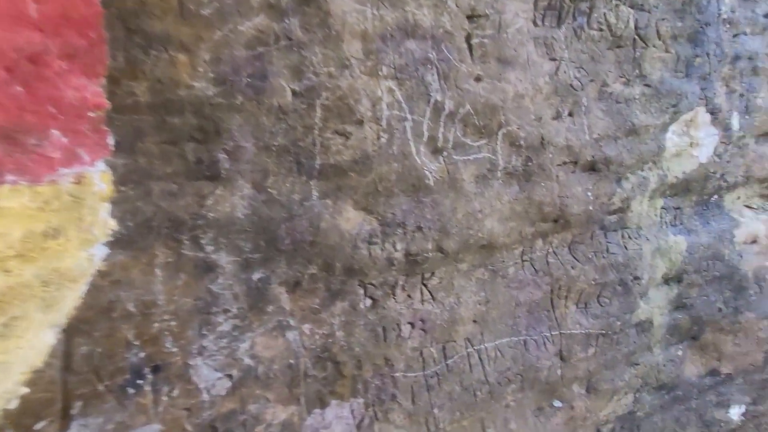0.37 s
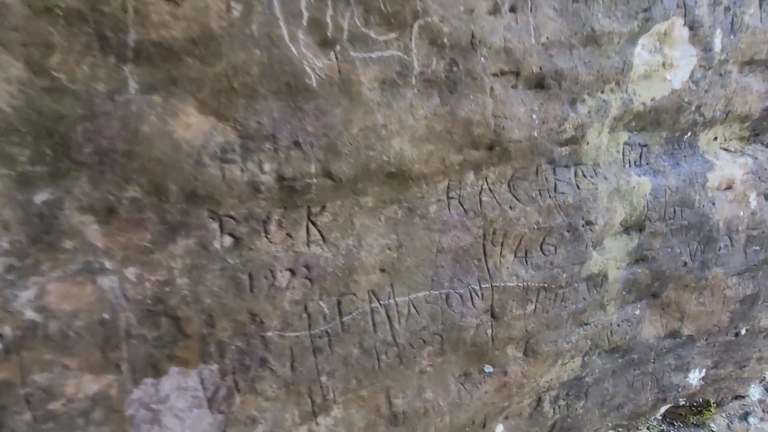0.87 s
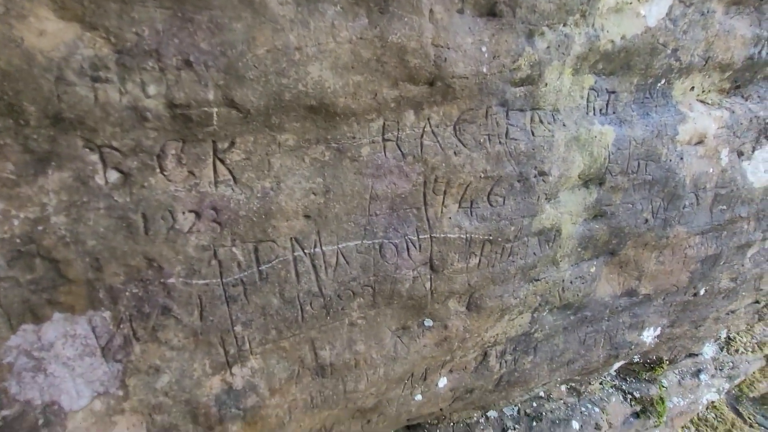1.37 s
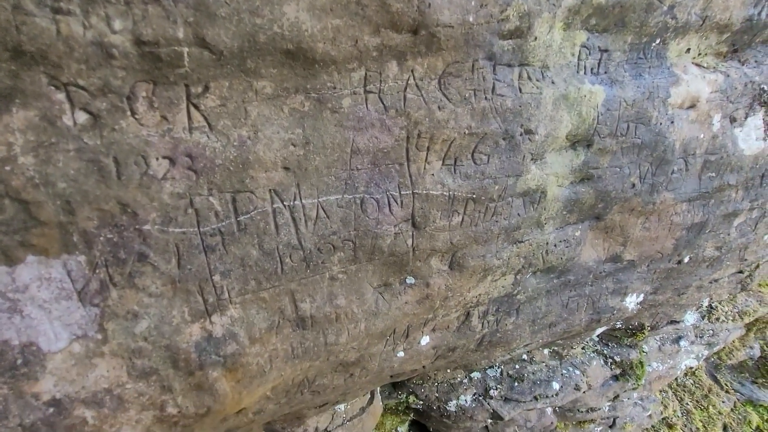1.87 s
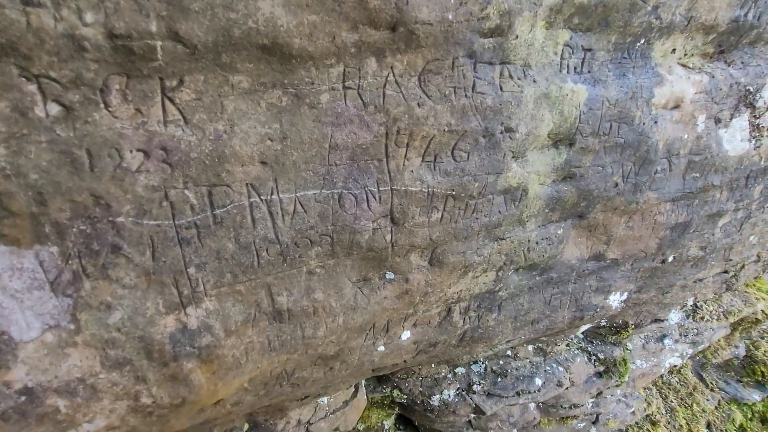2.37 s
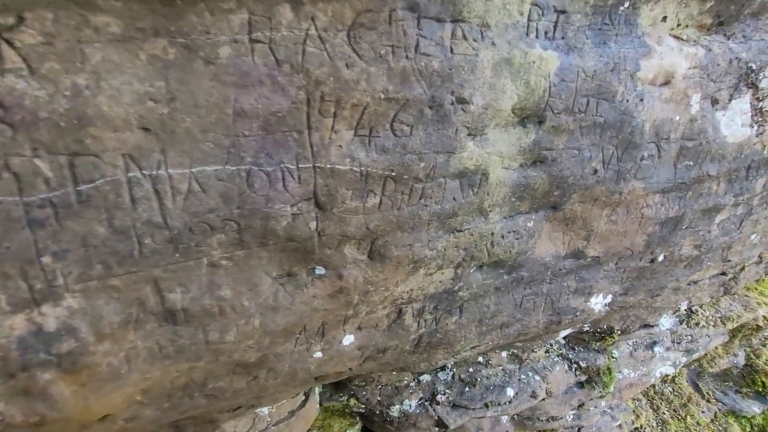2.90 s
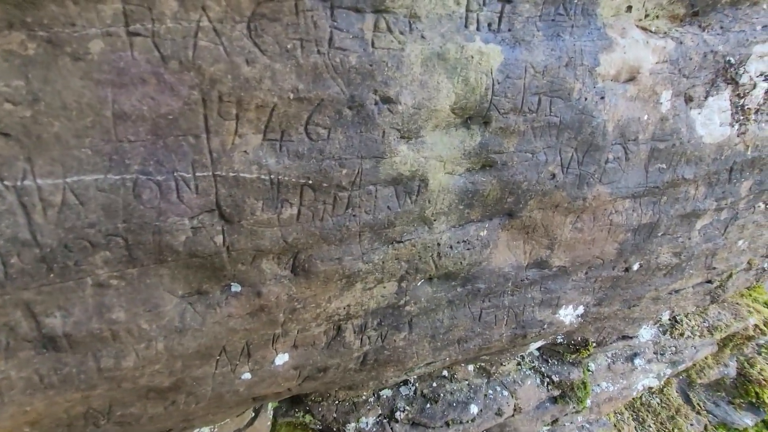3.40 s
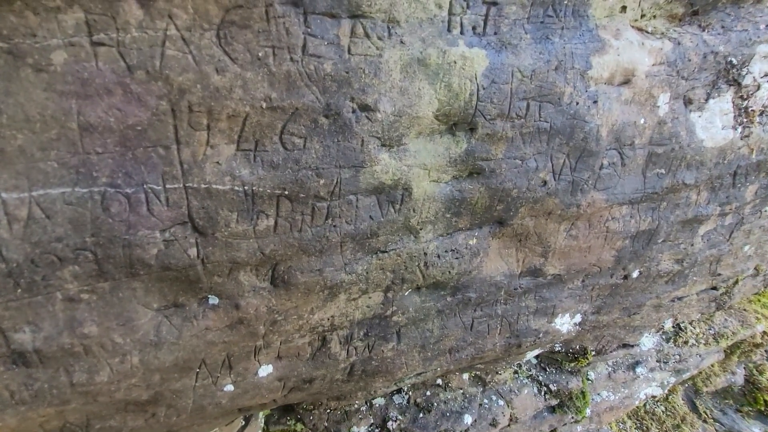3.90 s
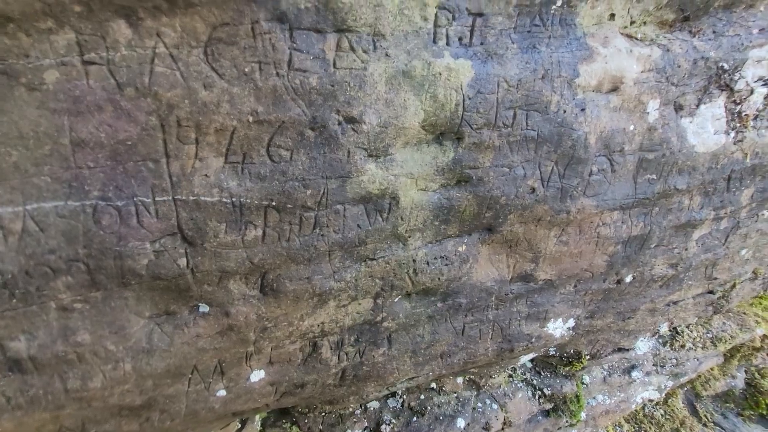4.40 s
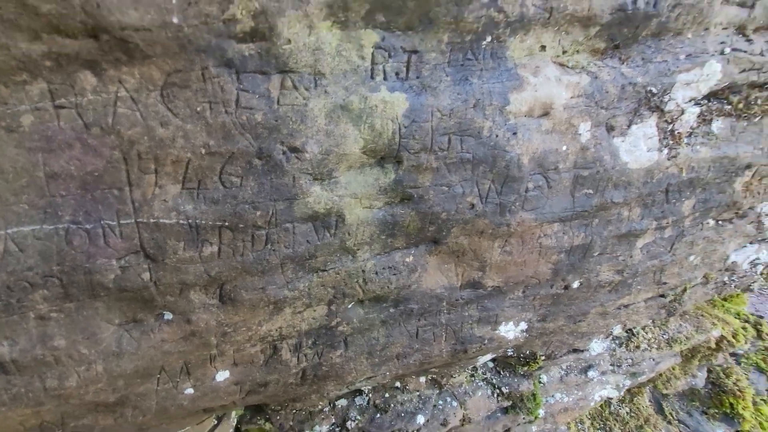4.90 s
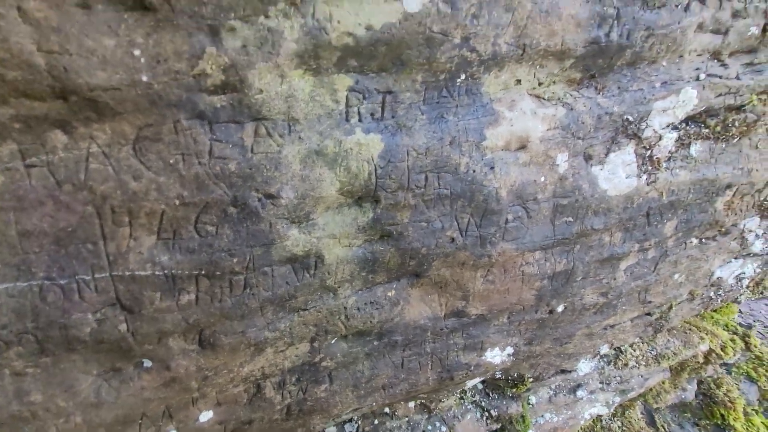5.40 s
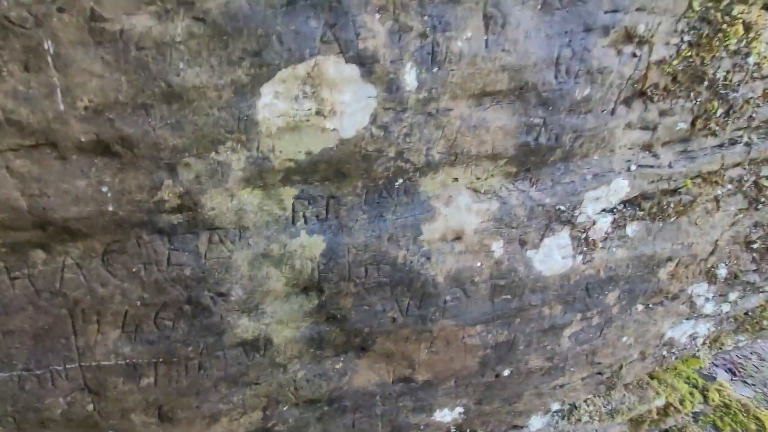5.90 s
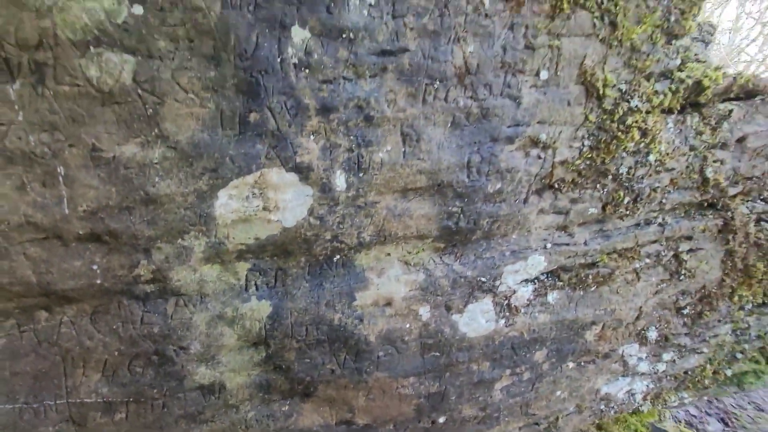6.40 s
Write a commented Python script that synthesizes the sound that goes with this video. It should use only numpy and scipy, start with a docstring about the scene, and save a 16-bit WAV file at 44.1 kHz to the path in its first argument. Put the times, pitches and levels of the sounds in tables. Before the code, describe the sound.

Outdoors in woodland beside rock, a handheld camera picks up rustle, hiss and finger ticks. A soft low thump comes as a small bird begins thin chips, then quickens into a bright trill, falling notes and a firm final flourish. Fainter birds whistle behind. After the song it is quieter, with a faint insect drone, then sharper ticks and scuffs, mostly on the left, and a bright rub at the end.

```python
"""Woodland: a small songbird trills, its gliding tones blurred by echoes from trunks and rock; other birds whistle.
A handheld camera's motion makes rustle in a lower and a middle band, cloth noise and hiss, all filtered random
noise, swell and fade, over wind rumble and buffeting with a strength curve of their own.
Fingers tick and scuff its body and soft bumps thump it: damped modes and noise bursts.
A faint insect drones past on a harmonic series."""
import sys
import numpy as np
from scipy import signal
from scipy.fft import rfft, irfft, next_fast_len
from scipy.io import wavfile
from scipy.ndimage import uniform_filter1d, map_coordinates

SR = 44100
rng = np.random.default_rng(int(sys.argv[2]) if len(sys.argv) > 2 else 0)


def convert_level_to_amplitude(level_db):
    """Map a level in decibels to its linear amplitude factor."""
    exponent = np.asarray(level_db, float) / 20
    return 10 ** exponent


def generate_wav(signal):
    """Clip the signal to [-1, 1] and save it as 16-bit WAV at the path in sys.argv[1]."""
    frames = np.transpose(np.atleast_2d(signal))
    scaled = np.clip(frames, -1, 1) * 32767
    pcm = np.round(scaled).astype(np.int16)
    wavfile.write(sys.argv[1], SR, pcm)


N = 287532

# resonant modes of camera and hand: frequency_hz, t60_s
BODY_MODES = [(70, 0.31), (129, 0.2), (240, 0.046), (380, 0.023), (850, 0.0077), (1300, 0.0035)]
# soft bumps of the hand, relative levels: time_s, boom_db, shudder_db
HAND_BUMPS = [(0.05, -59, -60), (0.541, -61, -52), (.832, -56, -40.5), (.935, -72, -47), (1.0, -72, -46.5),
              (1.121, -56, -53), (1.4294, -36.5, -68), (1.4527, -30, -49), (1.4789, -30.5, -56),
              (1.601, -52.5, -60), (1.761, -56.5, -53.5), (1.894, -54.5, -59), (2.446, -62, -53),
              (2.6, -51.5, -57), (3.25, -61, -55), (3.36, -64, -52), (3.52, -70, -58), (4.429, -75, -65),
              (4.54, -77, -66), (4.9672, -45, -54.5), (5.08, -51, -64), (5.151, -51, -50), (5.45, -65, -61),
              (5.65, -50, -62), (5.702, -70, -51.5), (5.8, -51.5, -54), (5.895, -51, -55.5),
              (5.972, -48.5, -50), (6.225, -53, -73), (6.281, -52, -53.5), (6.371, -62, -59)]


def unit(x):
    """Normalisation: divides by the root mean square, giving rms 1."""
    return x / np.sqrt(np.mean(x ** 2) + 1e-20)


def along(points, hz):
    """Spectral interpolation: joins (Hz, value) points by straight lines on a log-frequency axis."""
    point_hz, values = np.transpose(points)
    return np.interp(np.log(hz + 1), np.log(point_hz + 1), values)


def curves(rows):
    """Slow control: joins each column after the time by straight lines, one value per sample."""
    times, *columns = np.transpose(rows)
    return [np.interp(np.arange(N) / SR, times, column) for column in columns]


def wobble(rate):
    """Random modulation: a smooth curve through random knots, rate of them per second."""
    knots = rng.standard_normal(int(N * rate / SR) + 4)
    return map_coordinates(knots, [np.arange(N) * rate / SR])


def sides(pan_db):
    """Level panning: left and right gains pan_db apart, with constant total power."""
    left = convert_level_to_amplitude(pan_db)
    return np.array([left, left ** 0]) * np.sqrt(2 / (1 + left ** 2)) * np.sqrt(2)


def airborne(x):
    """Propagation delay: sound through the air reaches the right port after the left."""
    delay_s = 0.00038
    return np.array([x[0], np.roll(x[1], round(delay_s * SR))])


def swell(s, db, rise, fall):
    """Exponential growth and decay: a gain that peaks at db at time s, with slopes in dB per second."""
    late = np.arange(N) / SR - s
    return convert_level_to_amplitude(db - np.where(late < 0, -rise * late, fall * late))


def rush(tone, alike, patchy_db):
    """Filtered noise: coloured stereo noise of rms 1, patchy in time and frequency, correlated by alike."""
    hz, _, spectrum = signal.stft(rng.standard_normal((2, N)), SR, nperseg=2048)
    field = rng.standard_normal(spectrum.shape[1:])
    field = uniform_filter1d(field, 20, axis=0)  # across frequency
    field = uniform_filter1d(field, 3, axis=1)  # across time
    gain = convert_level_to_amplitude(along(tone, hz)[:, None] + patchy_db * unit(field))
    a, b = signal.istft(spectrum * gain, nperseg=2048)[1][:, :N]
    turn = np.arccos(np.clip(alike, 0, 1)) / 2
    common, opposed = np.cos(turn) * a, np.sin(turn) * b
    return unit(np.array([common + opposed, common - opposed]))


def rings(db, modes, t):
    """Modal resonance: one blow starts damped sines, each at a slightly random level with a soft onset."""
    total = 0
    for hz, t60 in modes:
        decay = convert_level_to_amplitude(db + rng.normal(0, 1) - 60 * t / t60)
        onset = 1 - np.exp(-3 * hz * t)
        total = total + decay * np.sin(2 * np.pi * hz * t) * onset
    return total


def echoes(stretch):
    """Diffuse reverberation: a dense crowd of near echoes, then a fainter decay whose rate varies with pitch."""
    # woodland decay: frequency_hz, t60_s before the stretch
    wood_decay = [(2000, 0.97), (4500, 0.43), (8000, 0.56)]
    hz, t, spectrum = signal.stft(rng.standard_normal((2, SR // 3)), SR, nperseg=128)
    build_up = 1 - 0.51 * np.exp(-t / 0.0077)
    near = (1 + 1.22 / (1 + (t / 0.045) ** 6)) * build_up
    decay = convert_level_to_amplitude(-60 * t / (stretch * along(wood_decay, hz)[:, None]))
    tail = signal.istft(spectrum * near * decay, SR, nperseg=128)[1]
    return tail / np.linalg.norm(tail[0]) * np.sqrt(2)


def bird(notes, buzz, direct_db, stretch, pan_db):
    """Frequency modulation: gliding sines buzz, deeper the wider they glide, each note with fresh echoes."""
    buzz_floor_hz = 249  # added to the glide's width, so that even a level note buzzes
    out = np.zeros((2, N + 2 * SR))
    buzz_hz = 230 * convert_level_to_amplitude(3 * wobble(90))
    quaver = buzz * np.sin(np.cumsum(2 * np.pi * buzz_hz / SR))
    for s, length, *glide, db in notes:
        start = round(s * SR)
        u = np.linspace(0, 1, round(length * SR))
        pitch = np.polyval(np.polyfit([0, 0.5, 1], glide, 2), u)
        pitch = pitch + (np.ptp(glide) + buzz_floor_hz) * quaver[start:][:len(u)]
        envelope = convert_level_to_amplitude(db) * np.sqrt(2) * np.sin(np.pi * u) ** 0.2
        note = envelope * np.sin(2 * np.pi * np.cumsum(pitch) / SR)
        path = echoes(stretch)
        path[:, 0] += convert_level_to_amplitude(direct_db)
        heard = signal.fftconvolve(note[None], path, axes=1)
        out[:, start:start + heard.shape[1]] += heard
    return out[:, :N] * sides(pan_db)[:, None]


def insect():
    """Harmonic series: a wavering wing-beat drone, its third and fourth partials set strongest."""
    # wing beat before random wavering: time_s, pitch_hz, level_db
    wing_beats = [(2.5, 210, -91), (2.7, 212, -98), (3.4, 241.8, -90), (3.8, 231, -95), (4.04, 219, -70),
                  (4.15, 212.7, -82), (4.55, 196, -84.5), (4.75, 195, -99)]
    hz, db = curves(wing_beats)
    phase = 2 * np.pi * np.cumsum(hz * (1 + 0.01123 * wobble(25))) / SR
    partials = [(1, -4), (2, -4), (3, -1), (4, -2)]  # multiple, level_db
    return sum(convert_level_to_amplitude(db + level + 5.4 * wobble(7)) * np.sin(k * phase) for k, level in partials)


def wind():
    """Low-frequency turbulence: lumpy rumble and shell buffeting, alike in both ports; bumps add shudder."""
    # wind on the ports, relative level: time_s, level_db
    wind_levels = [(0, -60), (.16, -64), (.56, -63.5), (1.16, -65), (1.43, -67.5), (1.75, -69), (2.01, -65),
                   (2.2, -68), (2.61, -65.5), (3.27, -65), (3.83, -70), (4.05, -72), (4.54, -74),
                   (5.04, -62), (5.43, -70), (5.9, -76), (6.26, -64), (6.41, -57.5), (6.52, -58.5)]
    # noise colours: frequency_hz, relative_level_db
    rumble_tone = [(21, -61), (36, -28), (48, 11), (65, -3.5), (110, -8), (140, -50), (240, -120)]
    buffet_tone = [(59, -43), (100, -12), (151, 7), (188, -6), (247, -1), (291, -5), (400, -18.5),
                   (520, -64), (880, -120)]
    shake_db = 0.5  # the shell's steady shaking over the wind
    rise_db_per_s, fall_db_per_s = 505, 170  # shudder slopes
    wind_db, = curves(wind_levels)
    shudder_power = sum(swell(s, db, rise_db_per_s, fall_db_per_s) ** 2 for s, _, db in HAND_BUMPS)
    rumble_noise = convert_level_to_amplitude(1.1 * wobble(14)) * rush(rumble_tone, alike=1.0, patchy_db=-3.0)
    rumble = convert_level_to_amplitude(wind_db + 5.5) * unit(rumble_noise)
    buffet_noise = convert_level_to_amplitude(1.93 * wobble(18)) * rush(buffet_tone, alike=0.92, patchy_db=-0.56)
    buffet = np.sqrt(convert_level_to_amplitude(wind_db + shake_db) ** 2 + shudder_power) * unit(buffet_noise)
    return (rumble + buffet) * convert_level_to_amplitude([[-0.7], [0.7]])  # right slightly louder


def motion():
    """Amplitude-modulated noise: rustle, cloth and hiss follow the camera's motion, with bright rubs."""
    # the camera's motion: time_s, strength_db, heaviness_db, left_minus_right_db (last two scaled per layer)
    camera_motion = [(0, -56, 8, -3), (.13, -57.5, 4.5, 1), (.25, -54, 4, 1), (.56, -51.5, 1, 1.5),
                     (.83, -53, 0, 0.5), (.94, -53.5, 4.5, 1), (1.23, -59, 0, -1), (1.72, -60.5, -5, -1),
                     (1.84, -62.5, 14, 2), (1.98, -61.5, -5, -3), (2.27, -65, -1, -2),
                     (2.42, -62, -2.5, -3), (2.46, -57, 1.5, -4), (2.6, -54, 2, -0.5), (2.89, -61, -1, 3),
                     (3.05, -63.5, -1, 0), (3.11, -57.5, -7, 3), (3.27, -57.5, -6.5, 2),
                     (3.38, -60, 2.5, 1), (3.6, -54, -3, 4.5), (3.85, -60.5, -3.5, 3), (4.01, -60, -3, 3),
                     (4.21, -69.5, 0.5, 1.5), (4.38, -80, 10, -6), (4.52, -70.5, 1, 2),
                     (4.7, -60.5, -3.5, -3), (4.85, -58, -2.5, 3), (5.0, -58.5, 4.5, -2),
                     (5.1, -62.5, 6, 0), (5.45, -61.5, -1, 3), (5.75, -63, 8.5, 0), (5.765, -51.5, 0.5, -7),
                     (5.81, -58, 1.5, -5), (5.87, -66, 6.5, -4), (5.95, -62, 4.5, -4), (6.15, -55, -5.5, 5),
                     (6.3, -54.5, 5, -9), (6.42, -53, 2, -2), (6.52, -47, 0, -8)]
    # brighter rubs by the right port: peak_s, level_db, left_minus_right_db
    rubs = [(6.36, -50.5, -16), (6.52, -33.5, -23)]
    # noise colours: frequency_hz, relative_level_db
    rustle_tone = [(190, -15), (330, 2), (488, 0), (696, -2.5), (1000, 0.5), (1310, -3.5), (2000, -6),
                   (2600, -21), (4400, -120)]
    # the middle band of the handling rustle: frequency_hz, relative_level_db
    middle_rustle_tone = [(1060, -12), (1800, -6.5), (2370, -1.5), (3300, -1), (3700, -0.5), (4810, -2),
                          (8140, -120)]
    # noise colours: frequency_hz, relative_level_db
    cloth_tone = [(2060, -46), (3500, -9), (4440, -1), (5630, -1), (6550, -2.5), (7180, -1), (7610, -4.5),
                  (8400, -18), (10900, -12.5), (18500, -120)]
    hiss_tone = [(4700, -43), (8000, -3.5), (8500, -5.5), (9000, -5.5), (12000, 5.5), (15000, 11),
                 (15750, 14), (15950, -37)]
    swipe_tone = [(1470, -34), (2500, -20), (2940, -17), (3230, -17), (5340, -16), (7190, -1.5),
                  (9500, -21), (12400, -48), (20900, -120)]
    still_strength_db = -60  # strength of a quiet hold
    rise_db_per_s, fall_db_per_s, swipe_hiss_db = 235, 600, -4
    flicker_db = 0.9 * wobble(25)  # shared by all layers
    strength_db, heavy_db, turn_db = curves(camera_motion)
    swipe = sum(swell(s, db, rise_db_per_s, fall_db_per_s) * sides(pan_db)[:, None]
                for s, db, pan_db in rubs)
    # colour, still_db, growth with strength, share of heaviness, pan_db, share of turning, correlation,
    # share of the swipes
    layers = [(rustle_tone, -68.5, 1.01, 1.01, -1.5, 0.3, 0.6, 0.03),
              (middle_rustle_tone, -71, 1.4, 0.6, -1.5, 0.4, 0.4, 0.06),
              (cloth_tone, -61, 1.05, 0.1, -6, 0.6, 0.2, 0),
              (hiss_tone, -59.7, 1.01, -0.05, 6.5, 1.01, 0, convert_level_to_amplitude(swipe_hiss_db))]
    out = np.zeros((2, N))
    for tone, still_db, grows, heavy, pan_db, turns, alike, swiped in layers:
        level_db = still_db + grows * (strength_db - still_strength_db) + heavy * heavy_db
        gain = np.hypot(convert_level_to_amplitude(level_db), swiped * swipe.mean(axis=0))
        noise = airborne(rush(tone, alike, patchy_db=2.18))
        out += convert_level_to_amplitude(flicker_db) * gain * sides(pan_db + turns * turn_db) * noise
    return out + swipe * rush(swipe_tone, alike=0, patchy_db=1.3)


def scuffs():
    """Stick-slip friction: skin slides over the shell, lumpy broad noise under each stroke."""
    # fingers sliding, relative level: start_s, length_s, level_db, left_minus_right_db
    strokes = [(0.93, 0.031, -52.5, -20), (1.803, 0.126, -59, 1.5), (4.969, 0.061, -48, -0.5),
               (5.164, 0.06, -55, -3.5), (5.664, 0.051, -38.5, -4), (5.759, 0.021, -58, 0)]
    # noise colour: frequency_hz, relative_level_db
    scuff_tone = [(120, -49), (200, -1), (423, 5), (598, -8), (1200, -2), (2310, -18.5), (5060, -7),
                  (9080, -15), (15700, -12.5)]
    gain = np.zeros((2, N))
    for s, length, db, pan_db in strokes:
        u = np.linspace(0, 1, round(length * SR))
        arc = np.sin(np.pi * u ** 0.97) ** 0.4
        gain[:, round(s * SR):][:, :len(u)] += convert_level_to_amplitude(db) * arc * sides(pan_db)[:, None]
    return gain * unit(convert_level_to_amplitude(2.3 * wobble(250)) * rush(scuff_tone, alike=0.54, patchy_db=2.0))


def bumps():
    """Modal resonance: soft bumps of the hand boom in the two lowest modes, alike in both ports."""
    out, t = np.zeros((2, N + SR)), np.arange(SR // 3) / SR
    for s, boom_db, _ in HAND_BUMPS:
        out[:, round(s * SR):][:, :len(t)] += rings(boom_db + 3.5, BODY_MODES[:2], t)
    return out[:, :N]


def taps():
    """Impact excitation: finger taps give a noise tick and ring the upper modes, panned to either port."""
    # finger taps on the camera, relative levels: time_s, tick_db, knock_db, clack_db, left_minus_right_db
    finger_taps = [(0.0489, -27, -48, -46, 3), (0.2505, -43.5, -50, -46, 6), (0.7876, -42, -49, -67, -5),
                   (0.8317, -51, -34, -51, 3.0), (0.9297, -30, -39.5, -57, 0), (0.95, -22.5, -41.5, -48, 1),
                   (0.9993, -40, -41, -70, 2.5), (1.1205, -40, -46.5, -68, -5), (1.4793, -35, -50, -69, 2),
                   (1.7564, -45, -43, -51.5, -2), (1.7905, -54, -47, -42, 5), (1.896, -56, -75, -46, 9),
                   (2.4455, -19, -48, -37.5, -26), (2.5376, -38, -55, -31.5, 7),
                   (2.5995, -45, -64, -47.5, 3.0), (3.017, -46.5, -52.5, -70, -6),
                   (4.997, -25, -61, -49, 7), (5.0784, -28.5, -54, -54, -19), (5.151, -16, -41.5, -44, -24),
                   (5.5583, -52, -62, -49, -3), (5.6505, -28, -67, -66, -16),
                   (5.801, -14.5, -42.5, -63, -26), (5.8545, -44, -58, -42.5, -1),
                   (5.8933, -18, -40.5, -49, -22), (5.974, -21, -37, -57, -29),
                   (6.224, -15.5, -52, -46, -32)]
    out, t = np.zeros((2, N + SR)), np.arange(SR // 3) / SR
    _, middle, high = np.split(np.array(BODY_MODES), 3)
    for s, tick_db, knock_db, clack_db, pan_db in finger_taps:
        crack = convert_level_to_amplitude(-60 * t / 0.0045) * rng.standard_normal(len(t))
        tick = convert_level_to_amplitude(tick_db + 0.5) * crack / np.linalg.norm(crack)
        blow = tick + rings(knock_db + 5, middle, t) + rings(clack_db + 7.5, high, t)
        out[:, round(s * SR):][:, :len(t)] += blow * sides(pan_db)[:, None] * 0.67
    return out[:, :N]


def far_birds():
    """Distance by reverberation: downward whistles in a longer echo tail."""
    # far whistles: start_s, length_s, start_hz, end_hz, level_db
    whistles = [(1.87, .06, 2960, 2600, -66), (1.923, 0.088, 2507, 2463, -63),
                (2.077, 0.1, 2770, 2636, -63.5), (2.162, 0.077, 2370, 2250, -70),
                (2.282, 0.094, 2740, 2470, -71), (2.398, .17, 2705, 2446, -61.5),
                (3.43, .2, 3100, 2300, -64), (4.35, 0.042, 3166, 3030, -81.5),
                (5.528, 0.016, 3210, 3200, -71), (6.134, .023, 5540, 5340, -64),
                (6.222, 0.023, 5330, 5240, -58)]
    notes = [(s, length, start, (start + end) / 2, end, db) for s, length, start, end, db in whistles]
    return bird(notes, buzz=0.28, direct_db=-5, stretch=1.65, pan_db=-3.0)


def songbird():
    """Swept tones in reverberation: the singer's syllables, each of one or more gliding notes."""
    # the song: syllable, start_s, level_db
    song = [("chip", 1.318, -58.5), ("slur", 1.44, -51.5), ("chip", 1.525, -50.5), ("slur", 1.645, -49),
            ("chip", 1.73, -49), ("trill", 1.838, -45), ("trill", 1.956, -43.5), ("trill", 2.07, -42.5),
            ("trill", 2.196, -43), ("drop", 2.316, -44.5), ("drop", 2.425, -44.5), ("drop", 2.533, -44),
            ("drop", 2.636, -45.5), ("arch", 2.775, -44), ("arch", 2.945, -43.5), ("twitter", 3.106, -50),
            ("close", 3.306, -40)]
    # notes of each syllable: delay_s, length_s, start_hz, middle_hz, end_hz, level_db within the syllable
    syllables = {"chip": [(0, .036, 3850, 3650, 3350, 0.5)],
                 "slur": [(0.0013, 0.036, 5510, 5100, 4200, 0.5)], "trill": [(0, .024, 5310, 4760, 4060, 0),
                 (.034, .026, 4046, 4700, 6190, -2.5), (.054, .042, 5780, 5700, 5540, -12)],
                 "drop": [(0, .038, 5500, 4500, 3070, 0.5)], "arch": [(0, 0.031, 3004, 4180, 5110, -0.5),
                 (.028, 0.017, 4950, 5310, 5150, -2.5), (.048, .036, 5100, 3700, 2400, -6.5)],
                 "twitter": [(0, .03, 4100, 5900, 7300, -0.5), (.033, .03, 7240, 5950, 4500, -2),
                 (.078, .022, 4400, 5700, 6900, -3), (.1, .03, 6800, 5900, 4500, -5)],
                 "close": [(0, 0.019, 3210, 3170, 3210, -12), (.024, 0.025, 3220, 4100, 4600, -3.5),
                 (.044, .034, 4530, 4795, 4470, 1), (.078, .025, 4480, 4000, 3100, -2)]}
    notes = []
    for name, s, db in song:
        for delay, length, *glide, level in syllables[name]:
            notes.append((s + delay, length, *glide, db + level))
    return bird(notes, buzz=0.096, direct_db=-8, stretch=1, pan_db=-10.0)


def scene():
    """Superposition: insect, wind, motion and handling under the birds."""
    through_air = airborne(insect() + far_birds() + songbird())
    return wind() + motion() + scuffs() + bumps() + taps() + through_air


def low_pass(x):
    """Removes everything above the highest recorded frequency."""
    return signal.sosfilt(signal.butter(12, 16990, fs=SR, output="sos"), x)


def record(dry):
    """Linear filtering: deep bass rolls off, all above 15.8 kHz is cut steeply, and the right port's bass lags."""
    # phase lag of the right port: frequency_hz, lag_rad
    port_lag = [(40, .6), (150, .55), (500, .3), (1500, 0)]
    low_hz, top_hz, top_cut_db = 37.3, 15800, -30
    size = next_fast_len(N + 8192)
    hz = np.fft.rfftfreq(size, 1 / SR)
    turn = np.exp(-1j * along(port_lag, hz))
    treble = np.where(hz < top_hz, 1, convert_level_to_amplitude(top_cut_db))
    response = treble / (1 + (low_hz / (hz + 1)) ** 6)
    both = irfft(rfft(dry, size) * response * [turn ** 0, turn], size)[:, :N]
    return low_pass(both)


dry = scene()
out = record(dry)
generate_wav(out)
```